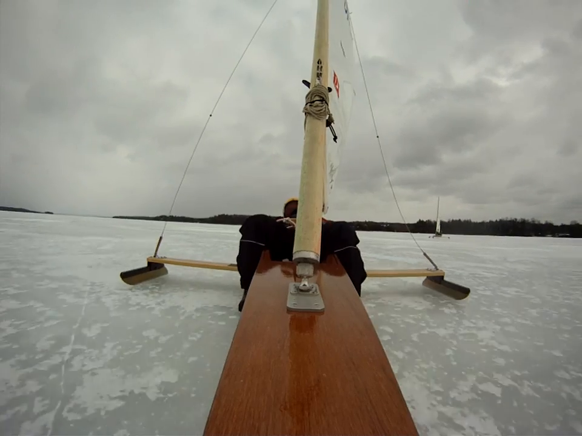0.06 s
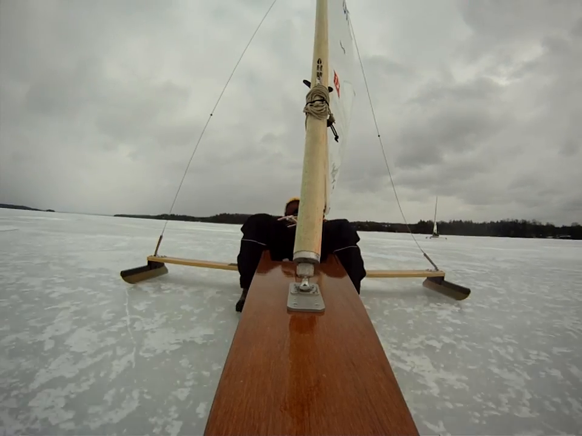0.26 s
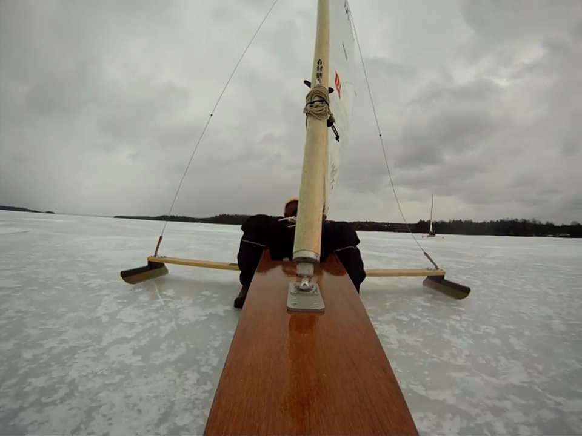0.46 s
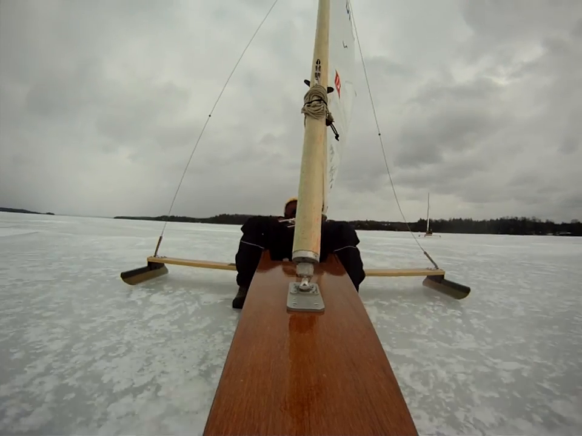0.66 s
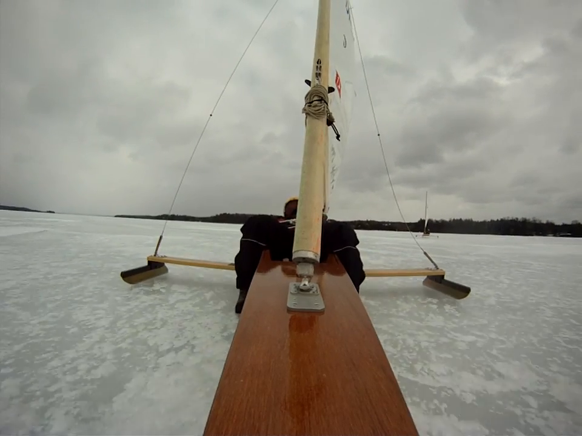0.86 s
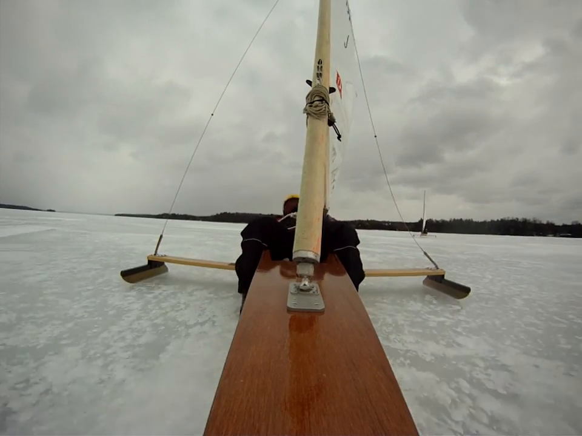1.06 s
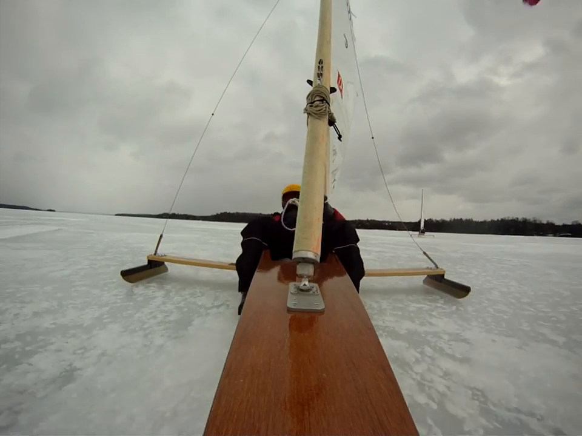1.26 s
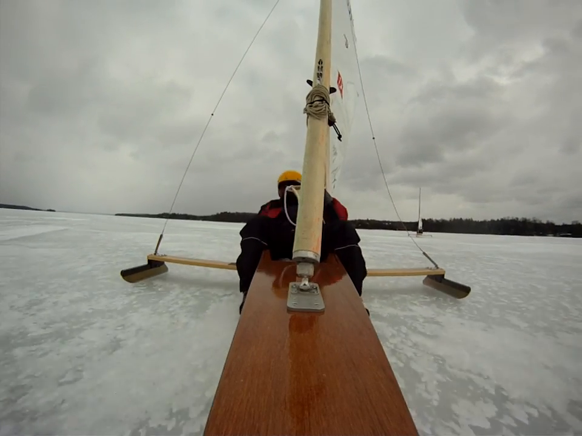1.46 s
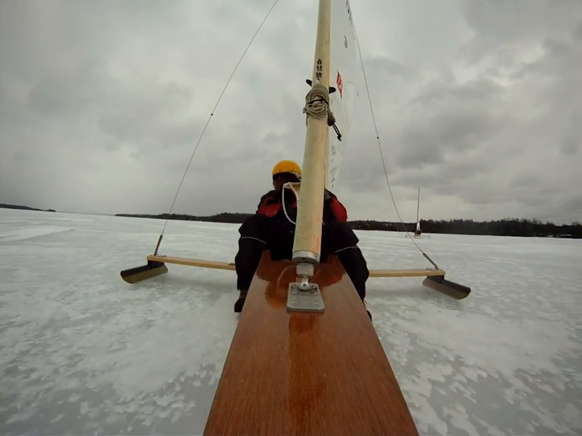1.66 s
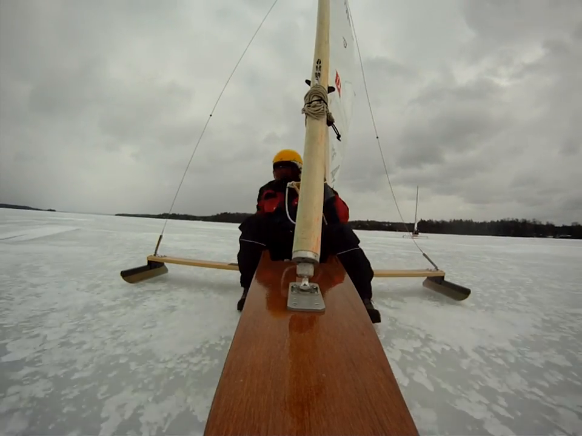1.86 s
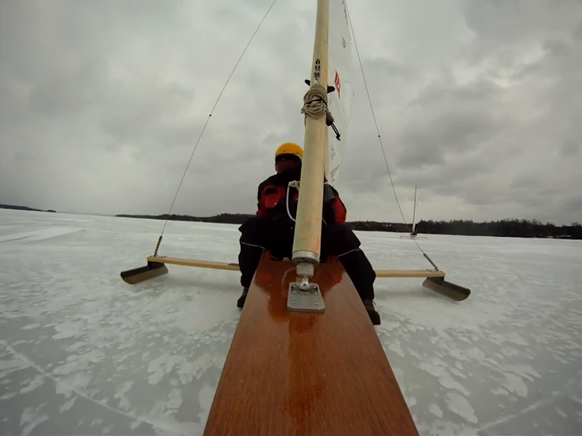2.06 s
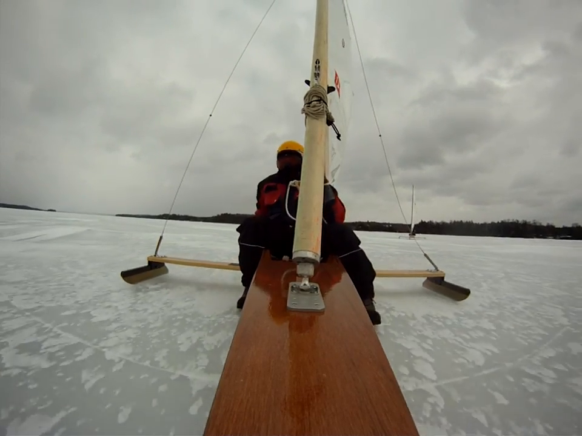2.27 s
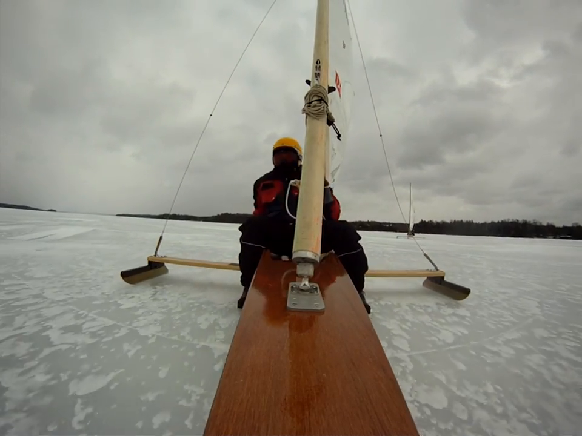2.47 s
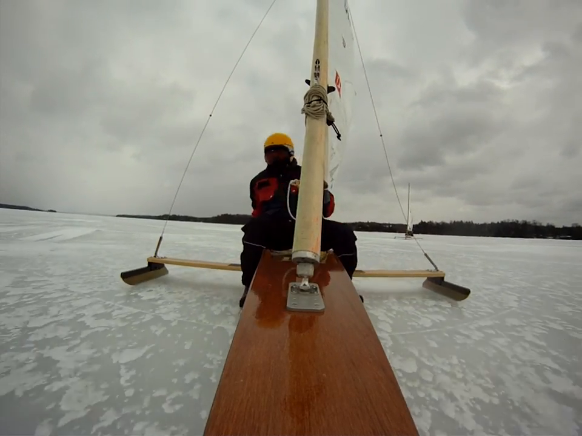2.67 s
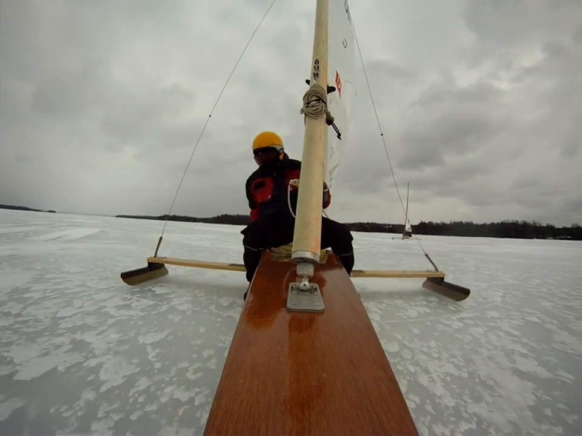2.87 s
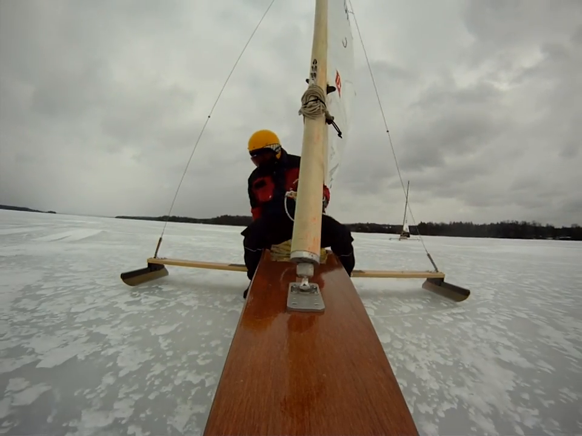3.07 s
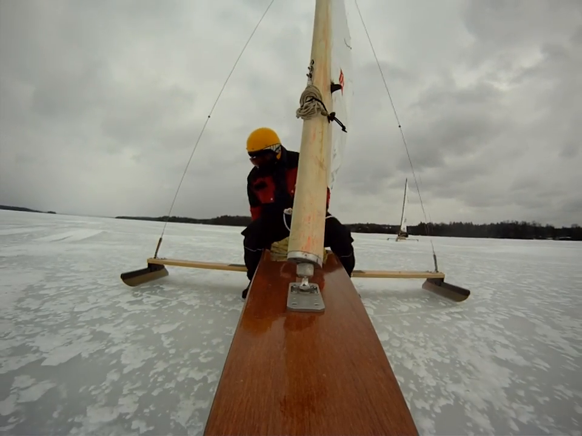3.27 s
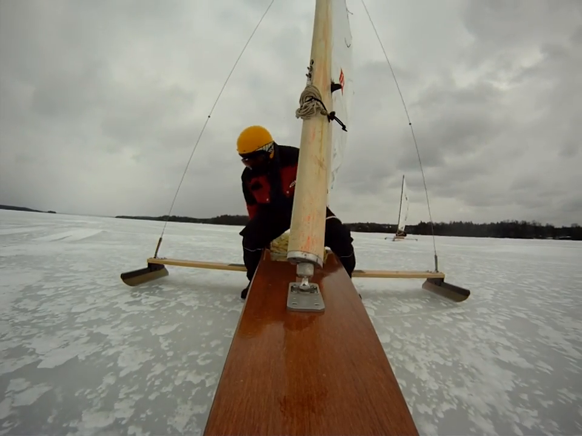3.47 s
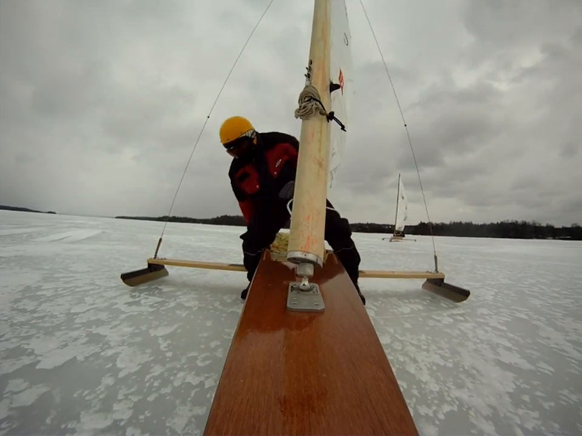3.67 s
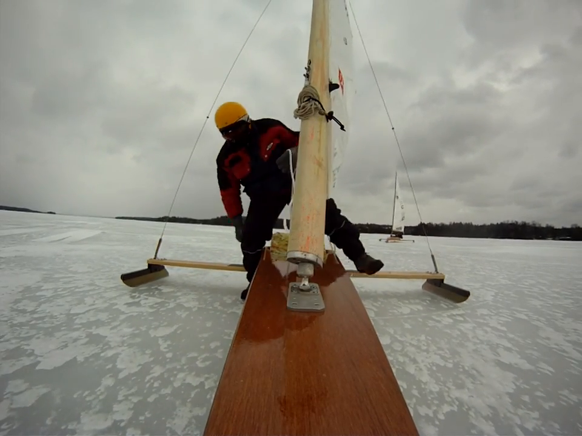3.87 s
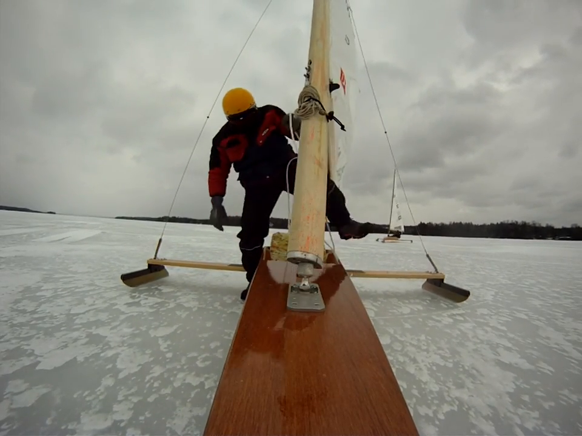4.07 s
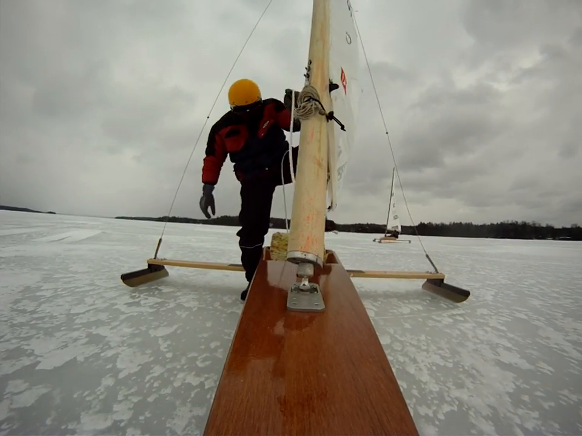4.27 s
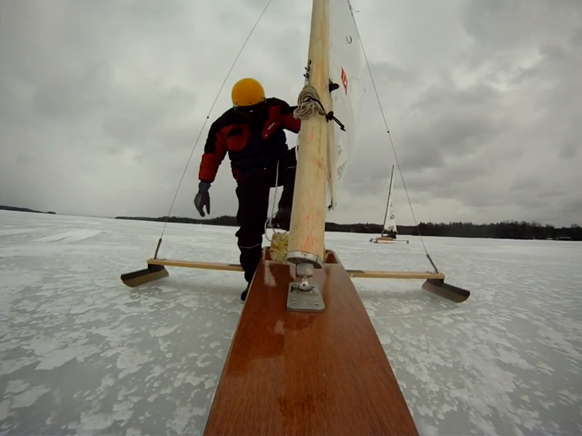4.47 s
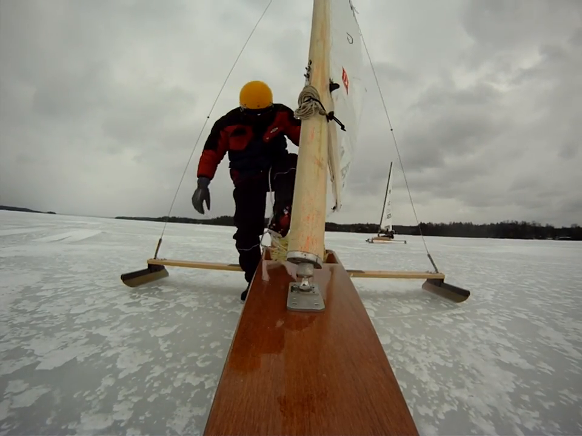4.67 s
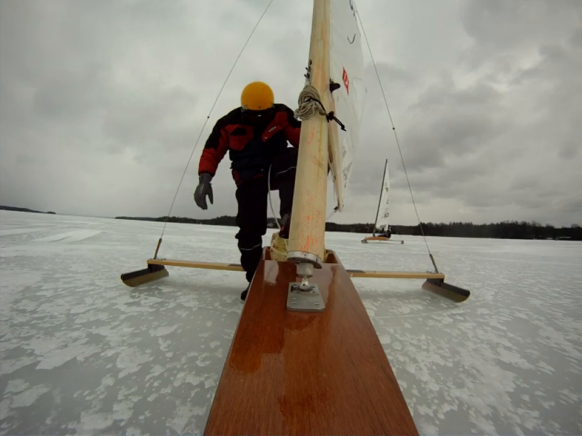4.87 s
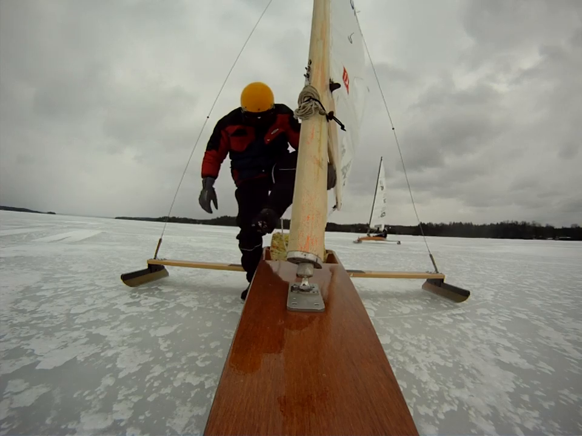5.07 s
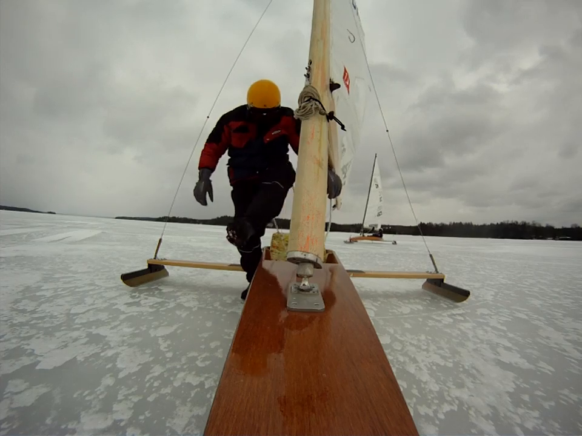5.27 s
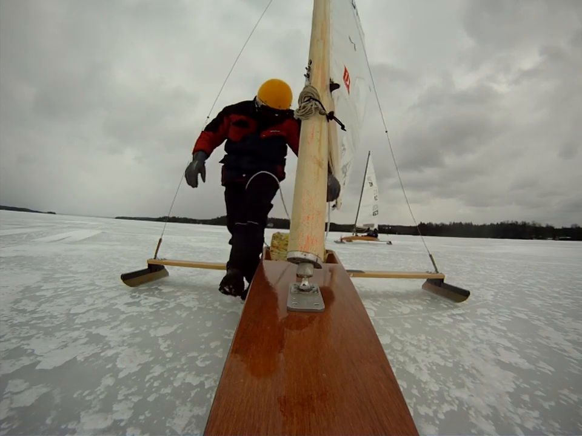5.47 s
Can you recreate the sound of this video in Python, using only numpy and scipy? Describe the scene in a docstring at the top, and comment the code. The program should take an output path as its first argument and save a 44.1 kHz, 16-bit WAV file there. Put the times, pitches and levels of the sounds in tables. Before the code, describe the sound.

Heard through the wood of an iceboat's bow, steel runners rumble and scrape over a frozen lake, with constant irregular thumps, short squeaks and metallic ticks. After about three seconds the ride dies down; hard boot and gear knocks strike the hull, a last cluster falls near 4.6 seconds, then almost nothing remains. The sound is close, dry and boxy with a glassy edge.

```python
"""An iceboat rattles over a frozen lake: runners rumble and scrape, a few squeak or sing, and ridges thump the hull.
It slows and slides to a halt, while boots and gear begin to knock against the boat as the sailor climbs out.
Random impacts, blows and noise shake the resonances of wood and steel; plain tones make the squeaks and notes.
Everything is heard through the wood, by a camera in a closed case bolted to the bow. Its coarse sampling
adds a glassy sheen on top. All levels in dB are those at the bow, before the camera."""
import sys
import numpy as np
from scipy import signal
from scipy.fft import rfft, irfft
from scipy.io import wavfile
from scipy.ndimage import uniform_filter1d

SR = 44100
rng = np.random.default_rng(int(sys.argv[2]) if len(sys.argv) > 2 else 0)


def transcribe(u):
    """Save the signal u as a 16-bit wav file named by the first command-line argument.

    u: samples, shape (n,) or (channels, n), limited to [-1, 1]; the rate is SR.
    q: integer samples, one column per channel.
    """
    v = np.clip(np.atleast_2d(u).T, -1, 1)
    q = np.round(v * 32767).astype(np.int16)
    wavfile.write(sys.argv[1], SR, q)


N = 243431
TIME = np.arange(N) / SR  # seconds
RING = 16384  # length of one ringing part or one blow, in samples
PLANK_THUMP_SHARE = 0.61  # the plank joins hull and chocks: this much of its level follows the hull


def undb(db):
    """Decibels to gain."""
    return 10 ** (np.asarray(db) / 20)


def unit(x):
    """Scale to rms 1."""
    return x / np.sqrt(np.mean(x ** 2))


def curves(rows):
    """One value per sample for each column after the time."""
    s, *columns = np.transpose(rows)
    return [np.interp(TIME, s, column) for column in columns]


def envelope(x, seconds):
    """Running rms."""
    power = np.abs(uniform_filter1d(x ** 2, max(int(seconds * SR), 1)))
    return np.sqrt(power + 1e-18)


def steady(x, seconds):
    """Keep the fine grain of a sound but hold its slow level at 1."""
    return x / envelope(x, seconds)


def band(x, low_hz, high_hz, order=2):
    """Band-pass filter."""
    return signal.sosfilt(signal.butter(order, [low_hz, high_hz], "band", fs=SR, output="sos"), x)


def swell(middle_s, half_s):
    """A bell-shaped rise and fall."""
    return np.exp(-.5 * ((TIME - middle_s) / half_s) ** 2)


def wander(rate):
    """Random levels held 1 / rate s and smoothed; spread 1."""
    hold = int(SR / rate)
    steps = np.repeat(rng.standard_normal(N // hold + 1), hold)
    return unit(uniform_filter1d(steps, hold))[:N]


def grains(rate, spread_db):
    """Random tiny impacts, `rate` per second, a few larger than the rest."""
    size = undb(spread_db * np.minimum(rng.exponential(size=N), 4))
    happens = rng.random(N) < rate / SR
    return happens * size * rng.standard_normal(N)


def contact(ms, chatter=.25):
    """Force of one blow: a first strike, then chatter that dies away."""
    t = np.arange(RING) / SR
    force = chatter * rng.standard_normal(RING) * np.exp(-1000 * t / ms)
    force[0] += 1
    return force


def resonance(f, hz, width):
    """Response of one damped mode, gain 1 at its centre."""
    return 1j * f * width / (hz ** 2 - f ** 2 + 1j * f * width)


def ring(modes, range_hz):
    """Impulse response of a part; neighbouring modes swing in opposite directions."""
    f = np.arange(RING // 2 + 1) * SR / RING
    response = 0
    for k, (hz, width, db) in enumerate(modes):
        response = response + (-1) ** k * undb(db) * resonance(f, hz, width)
    return band(irfft(response), *range_hz, order=4)


def shake(force, response):
    """A force played through a part."""
    return signal.fftconvolve(force, response)[:len(force)]


def add(out, s, sound):
    """Mix a sound in at time s."""
    start = max(int(s * SR), 0)
    out[start:start + len(sound)] += sound[:N - start]


# The tones that each part rings with when shaken: hollow wooden hull, cross plank,
# chocks that hold the runners, and steel runners.
# Each row: pitch in Hz, width in Hz (wider dies away faster), strength in dB.
HULL_MODES = [(109.7, 5.1, 6.5), (162, 4.9, -1), (203.2, 11.2, -13.5), (255.5, 8.4, 0.5), (280.6, 3.94, -4),
              (294.3, 8.9, -3), (343, 190, -22.5)]
PLANK_MODES = [(605, 42.4, 5.5), (699, 51.5, 6), (710.3, 40.3, 5)]
CHOCK_MODES = [(962, 82, -2), (1096.4, 19.4, 1.5), (1159, 32.5, -1.5), (1295, 53, 1), (1392.7, 41.7, 5.5)]
STEEL_MODES = [(1700, 79, -1.5), (1859, 22, 7.5), (2098, 99, 7.5), (2384, 81, 7.5), (2491, 74, 1.5),
               (3178, 95, -5), (3380, 48, -3), (3590, 100, -3.5), (3764, 85, -6)]
# range that each part passes on to the bow: low and high end in Hz
HULL_HZ, PLANK_HZ, CHOCKS_HZ, STEEL_HZ = (91, 352), (455, 920), (804, 1658), (1540, 3740)


def boat_parts():
    """Hull, plank, chocks and steel, each ringing with its own tones."""
    return (ring(HULL_MODES, HULL_HZ), ring(PLANK_MODES, PLANK_HZ),
            ring(CHOCK_MODES, CHOCKS_HZ), ring(STEEL_MODES, STEEL_HZ))


# The ride over the ice. Each row: time in seconds, hull rumble in dB, runner scrape in dB.
RIDE_LEVELS = [(0.0, -22.5, -31.5), (0.5, -19.5, -30), (0.65, -26, -35), (0.9, -32.5, -27.5),
               (1.06, -28, -33.5), (1.21, -25, -31.5), (1.41, -29, -41.5), (1.5, -22.5, -34.5),
               (1.95, -18.5, -32), (2.45, -26.5, -39.5), (2.72, -20.5, -31), (2.93, -27.5, -39),
               (3.08, -21, -34), (3.3, -34.5, -39.5), (3.8, -32, -42), (4.05, -40.5, -49.5),
               (4.85, -37.5, -51), (5.52, -50.5, -57.5)]


def ride():
    """Rumble and scrape levels in dB at every sample; several sources follow the scrape."""
    return curves(RIDE_LEVELS)


# Slow flexing of the whole boat. Each row: time in seconds, level in dB.
SWAY_LEVELS = [(0.0, -23), (0.25, -21), (0.5, -32), (0.85, -20.5), (1.15, -35), (1.8, -25), (2.7, -32),
               (3.4, -24), (4.1, -38.5), (4.9, -36), (5.52, -46.5)]


def sway():
    """The springy boat flexes far below its main hull tones: deep filtered noise."""
    level_db, = curves(SWAY_LEVELS)
    deep = band(rng.standard_normal(N), 23.4, 31.8)
    higher = band(rng.standard_normal(N), 29, 55.5, order=3)
    return steady(deep + undb(-10.5) * higher, 0.25) * undb(level_db)


# The tones of the rigging fittings. Each row: pitch in Hz, width in Hz, strength in dB.
FITTING_MODES = [(2270, 75, -2.5), (2350, 34, -29), (3224, 105, -11.5), (3080, 58, -15), (3630, 340, -5),
                 (3756, 110, -4)]
# Clear ticks and brief jangles. Each row: start in seconds, contact time in ms, strongest level in dB.
RIGGING_TICKS = [(0.238, 5.3, -19), (0.5443, 21, -21.5), (0.562, 20, -22.5), (0.6969, 7, -27.5),
                 (3.004, 4.7, -25.5), (3.0934, 9.4, -24.5), (3.3929, 8.4, -25), (4.105, 8, -46.5),
                 (4.347, 7, -41.5), (4.4856, 8, -36.5), (4.5681, 7, -27.5), (4.6987, 7.3, -22.5),
                 (4.998, 12, -48), (5.116, 7, -48.5), (5.244, 8, -49), (5.506, 7, -45)]
STRAY_RATE, STRAY_DB = 14, -14.5  # faint stray ticks: average per second, level against the scrape


def rigging(stray_ms=5):
    """Shackles and blocks tick against each other: a few clear ticks and many faint stray ones."""
    out, fitting = np.zeros(N), ring(FITTING_MODES, (1900, 3900))
    for s, ms, db in RIGGING_TICKS:
        tick = shake(contact(ms, chatter=0.29), fitting)
        add(out, s, tick * undb(db) / envelope(tick, 0.0042).max())
    _, scrape_db = ride()
    stray_hits = shake(grains(rate=STRAY_RATE, spread_db=2.0), contact(ms=stray_ms))
    strays = shake(stray_hits, fitting)
    return out + unit(strays) * undb(scrape_db + STRAY_DB)


# Swells of the crackle. Each row: middle in seconds, half length in seconds, level in dB.
CRACKLE_SWELLS = [(0.872, 0.12, -41.5), (1.917, 0.046, -47.5), (2.307, 0.13, -49.5), (3.152, 0.18, -48),
                  (3.848, .06, -48)]
CRACK_S, CRACK_DB = 3.1535, -16  # one snap with a hard knock: start in seconds, peak in dB
CRUNCH_DB, HISS_DB = -18, -72  # dry crackle against the scrape; thin hiss that stays at rest


def crunch(flutter_rate=52, sharpness=9):
    """Noise cut into about fifty strokes a second makes a faint dry crackle, with one snap and a thin hiss."""
    _, scrape_db = ride()
    swells = sum((undb(db) * swell(s, half_s)) ** 2 for s, half_s, db in CRACKLE_SWELLS)
    level = np.sqrt(undb(scrape_db + CRUNCH_DB) ** 2 + swells)
    phase = np.cumsum(flutter_rate * (1 + .25 * wander(rate=53))) / SR
    # each stroke starts hard and dies away; a little noise remains between strokes
    strokes = np.exp(-sharpness * (phase % 1)) * undb(5.4 * wander(rate=25)) + 0.26
    crackle = steady(band(rng.standard_normal(N) * strokes, 3040, 5410), 0.08) * level
    snap = band(contact(ms=2.0, chatter=0.34), 1800, 5900)
    add(crackle, CRACK_S, snap * undb(CRACK_DB) / np.abs(snap).max())
    hiss = unit(band(rng.standard_normal(N), 2800, 5600)) * undb(HISS_DB)
    return crackle + hiss


# A runner catches and squeaks. Each row: middle in seconds, pitch in Hz, peak in dB, half length in ms.
RUNNER_SQUEAKS = [(0.0606, 1370, -5, 2.4), (1.19, 1350, -4.5, 2.15), (2.687, 1387, -13.5, 2.8)]


def squeaks():
    """Steel sticks and slips on the ice for a few cycles: one short, swelling tone."""
    out = np.zeros(N)
    for s, hz, db, ms in RUNNER_SQUEAKS:
        tone = np.sin(2 * np.pi * (hz * TIME + rng.random()))
        out += undb(db) * swell(s, ms / 1000) * tone
    return out


# On smooth ice a runner sings a low note.
# Each row: start in seconds, length in seconds, pitch it settles at in Hz, level in dB.
SUNG_NOTES = [(0.631, 0.28, 108.2, -24.5), (0.692, 0.31, 244, -21.5), (1.415, 0.05, 255.5, -15.5),
              (3.305, 0.15, 238, -30), (3.48, 0.085, 255, -30)]
SHARP_SHARE, SETTLE_S = .04, 0.038  # each note starts sharp by this share and settles


def singing(fade_s=0.011, waver_db=-0.4):
    """A gliding runner sings a single tone that slides down to its pitch and wavers in level."""
    out = np.zeros(N)
    for s, length, hz, db in SUNG_NOTES:
        age = TIME - s
        pitch = hz * (1 + SHARP_SHARE * np.exp(-np.maximum(age, 0) / SETTLE_S))
        gate = np.clip(np.minimum(age, length - age) / fade_s + .5, 0, 1)
        waver = undb(waver_db * unit(band(rng.standard_normal(N), 20, 22)))
        tone = np.sqrt(2) * np.sin(2 * np.pi * np.cumsum(pitch) / SR)
        out += gate * waver * undb(db) * tone
    return out


THUMP_LEAD_S, RATTLE_LEAD_S = 0.00602, 0.00255  # start early: the parts take a few ms to get moving


def blows(rows, parts, plank_db, steel_db, thump_width_hz=260, damping_s=0.0062):
    """Each blow thumps the hull around its own pitch and rattles the stiffer parts."""
    hull, plank, chocks, steel = parts
    out = np.zeros(N)
    t, f = np.arange(RING) / SR, np.arange(RING // 2 + 1) * SR / RING
    for s, ms, hz, thump_db, rattle_db in rows:
        # a brief blow is a dead, broad thud; a long contact lets the hull boom at one pitch
        width_hz = thump_width_hz / ms ** 0.3
        push = irfft(rfft(contact(ms, chatter=0.047)) * resonance(f, hz, width_hz) ** 2)
        damped_hull = hull * np.exp(-t / (damping_s + ms / 1000))
        thump = shake(push, damped_hull)
        add(out, s - THUMP_LEAD_S, thump * undb(thump_db) / envelope(thump, 0.019).max())
        strike = contact(ms, chatter=0.2)
        bend_db = rattle_db + PLANK_THUMP_SHARE * (thump_db - rattle_db) + plank_db
        for part, db in (plank, bend_db), (chocks, rattle_db), (steel, rattle_db + steel_db):
            rattle = shake(strike, part)
            add(out, s - RATTLE_LEAD_S, rattle * undb(db) / envelope(rattle, 0.0077).max())
    return out


# Boots and gear knock against the boat. Each row: time in seconds, contact time in ms,
# thump pitch in Hz, strongest thump level in dB, strongest rattle level in dB.
GEAR_KNOCKS = [(3.026, 31, 181, -12.5, -43), (3.108, 37, 197, -14.5, -26.5), (3.15, 2.7, 263, -9, -12.5),
               (3.234, 27, 229, -15.5, -42), (3.412, 15, 214, -26, -48), (3.577, 4.2, 270, -13, -12.5),
               (3.598, 26.3, 247, -17, -20), (3.63, 7.5, 237, -21, -22), (3.657, 16, 149, -16.5, -32),
               (3.767, 17.5, 205, -17, -42), (3.8, 52, 171, -13.5, -45), (4.197, 7.7, 249, -27, -35),
               (4.222, 10, 262, -33, -46), (4.409, 4, 211, -48, -39.5), (4.461, 17, 266, -26.5, -43),
               (4.502, 22, 228, -35, -35), (4.601, 6.7, 262, -16, -13.5), (4.616, 26, 253, -10.5, -25.5),
               (4.65, 15.7, 244, -12.5, -20.5), (4.699, 14, 251, -24, -20), (4.775, 13, 144, -33, -27.5),
               (4.866, 5, 248, -30, -45), (5.071, 6.1, 200, -41, -37), (5.176, 6.4, 229, -43, -40.5)]


def knocks(parts):
    """Boots and gear strike the boat: thumps in the hull and rattles in the stiffer parts."""
    # plank against its share of the blow; steel against the rattle
    return blows(GEAR_KNOCKS, parts, plank_db=-14, steel_db=-3)


# The runners hit ridges in the ice. Each row: time in seconds, contact time in ms,
# thump pitch in Hz, strongest thump level in dB, strongest rattle level in dB.
ICE_RIDGES = [(0.135, 20, 125, -12.5, -28), (0.186, 9.5, 175, -29, -23.5), (0.216, 4.5, 163, -21, -10),
              (0.228, 12, 213, -20, -15), (0.324, 12, 156, -11, -23), (0.344, 14, 125, -18, -26),
              (0.53, 9, 235, -10, -21.5), (0.556, 29, 153, -18, -29), (0.59, 11, 130, -9, -20.5),
              (1.004, 13.6, 146, -15.5, -36), (1.118, 62, 213, -17.5, -25.5), (1.185, 1.7, 205, -15, -21.5),
              (1.25, 6, 157, -11.5, -18), (1.27, 13, 119, -17, -48), (1.334, 25, 182, -14, -20),
              (1.371, 28, 174, -13, -24), (1.489, 12, 232, -10, -17), (1.542, 36, 186, -10.5, -25),
              (1.666, 6.5, 185, -13.5, -23), (1.724, 5.1, 241, -13.5, -25.5),
              (1.783, 7.5, 265, -15.5, -19.5), (1.848, 2.5, 208, -8.5, -17.5), (2.057, 2.3, 189, -14, -27),
              (2.092, 2.9, 209, -16, -25), (2.194, 10, 187, -15.5, -29.5), (2.259, 7, 241, -15.5, -24.5),
              (2.329, 8.5, 240, -9, -16), (2.554, 15.6, 170, -8, -21), (2.608, 14, 248, -11.5, -34),
              (2.685, 12.4, 134, -11.5, -20.5), (2.762, 9.4, 174, -13.5, -34), (2.849, 0.9, 183, -8, -20),
              (2.943, 14.6, 169, -11, -30)]


def ridges(parts):
    """Ridges in the ice strike the runners, thump the hull and rattle the stiffer parts."""
    # plank against its share of the blow; steel against the rattle
    return blows(ICE_RIDGES, parts, plank_db=-8.5, steel_db=-5)


BOOM_DB, STOP_BOOM_DB = 3, -4.5  # deep boom against the rumble, at speed and at rest
SLOWING_S = (2.74, 4.3)  # the boat loses its speed, and the boom sinks, between these times


def runners(hull, plank, chocks, steel, split_hz=190, clump_db=2.0):
    """Rough ice shakes the hull and plank; crushed grains rasp in the chocks and blades."""
    rumble_db, scrape_db = ride()
    boom_db = rumble_db + np.interp(TIME, SLOWING_S, (BOOM_DB, STOP_BOOM_DB))
    # on rough ice, where the hull drums, the grains come in clumps; smooth ice gives a more even hiss
    roughness = np.clip((rumble_db - scrape_db + 2) / 14, .2, 1)
    clumps = undb(clump_db * roughness * wander(rate=70))
    bumps = grains(rate=640, spread_db=1.17)
    grit = grains(rate=1900, spread_db=0.34) * clumps
    wood = shake(bumps, hull)
    boom = steady(band(wood, 75, split_hz, order=4), 0.066) * undb(boom_db)
    drum = steady(band(wood, split_hz, 570, order=4), 0.11) * undb(rumble_db)
    groan_db = scrape_db + PLANK_THUMP_SHARE * (rumble_db - scrape_db) - 12.5
    groan = steady(shake(bumps * clumps, plank), 0.058) * undb(groan_db)
    chock_rasp = steady(shake(grit, chocks), 0.072)
    blade_rasp = undb(-3.5) * steady(shake(grit, steel), 0.27)
    return boom + drum + groan + (chock_rasp + blade_rasp) * undb(scrape_db)


def scene():
    """All vibration meets at the bow, the same in both channels."""
    parts = boat_parts()
    background = sway() + rigging() + crunch()
    gliding = squeaks() + singing() + runners(*parts)
    bow = background + gliding + knocks(parts) + ridges(parts)
    return np.array([bow, bow])


def record(dry):
    """The camera rounds the peaks, samples at 12 kHz and holds each value, leaving mirror copies around 12 kHz."""
    rounded = np.tanh(0.56 * dry) / 0.7
    coarse = signal.resample_poly(rounded, 40, 147, axis=1)  # 44.1 to 12 kHz
    stairs = np.repeat(coarse, 4, axis=1)  # each value held for four samples at 48 kHz
    held = signal.resample_poly(stairs, 147, 160, axis=1)[:, :N]  # 48 to 44.1 kHz
    low_pass = signal.ellip(8, .2, 70, 15400, fs=SR, output="sos")  # nothing much above 15.4 kHz
    return signal.sosfilt(low_pass, held)


dry = scene()
out = record(dry)
transcribe(out)
```